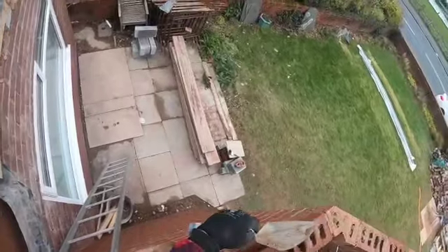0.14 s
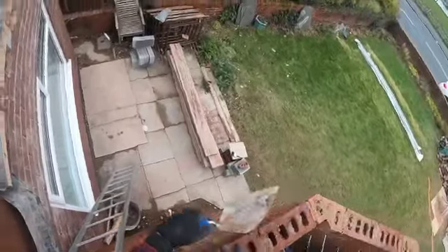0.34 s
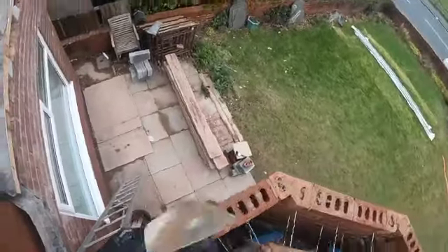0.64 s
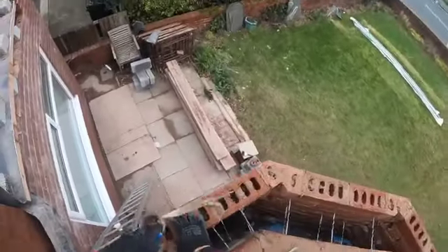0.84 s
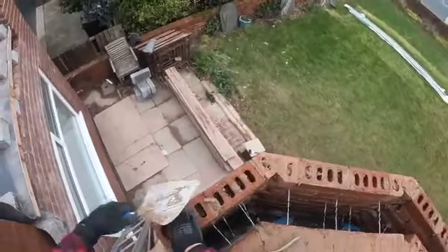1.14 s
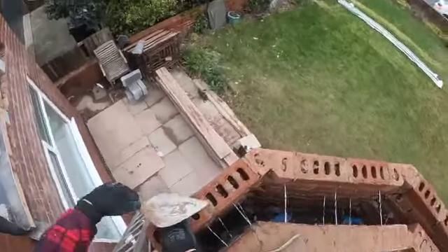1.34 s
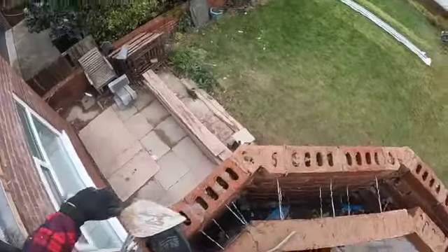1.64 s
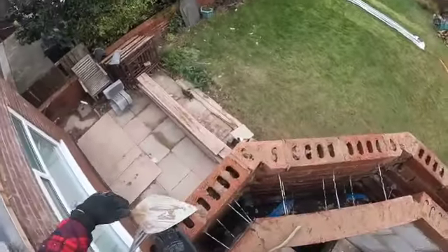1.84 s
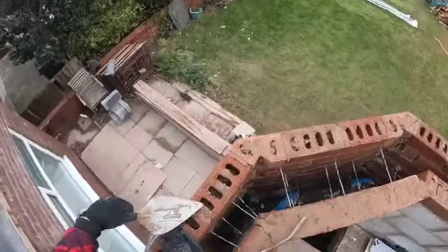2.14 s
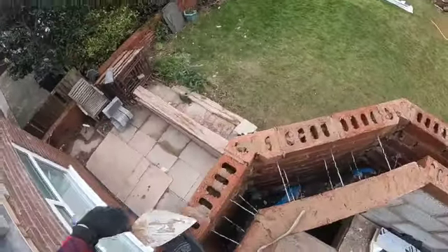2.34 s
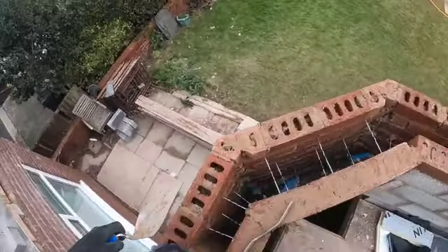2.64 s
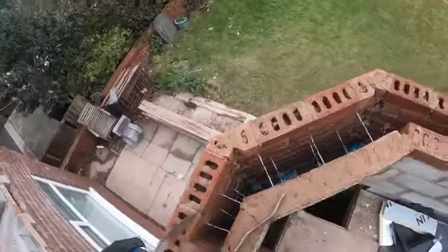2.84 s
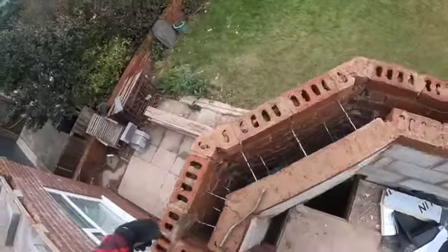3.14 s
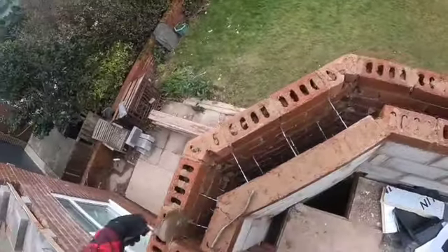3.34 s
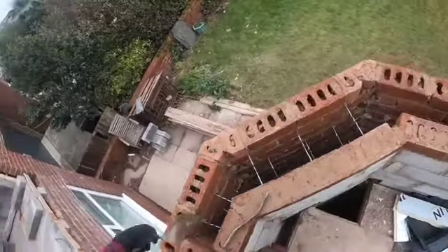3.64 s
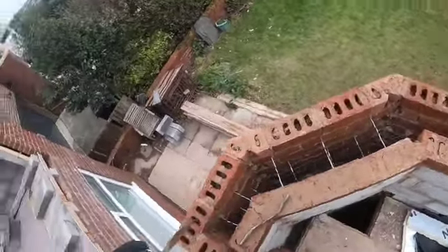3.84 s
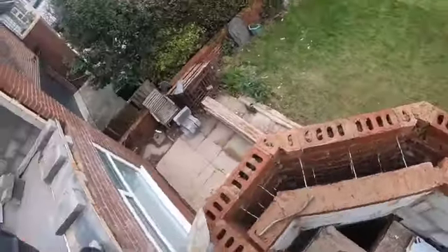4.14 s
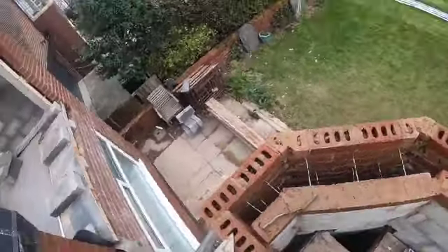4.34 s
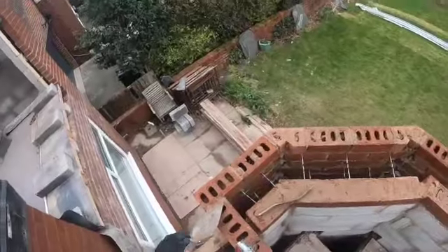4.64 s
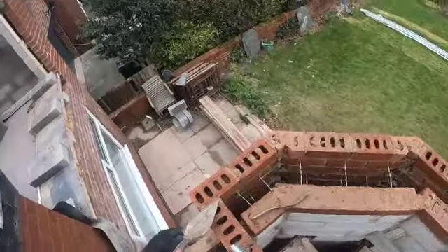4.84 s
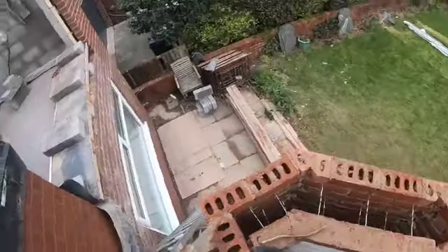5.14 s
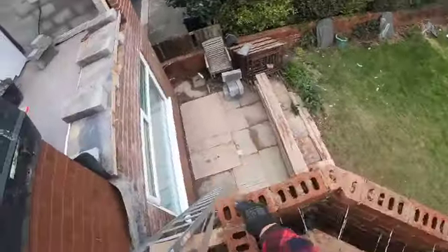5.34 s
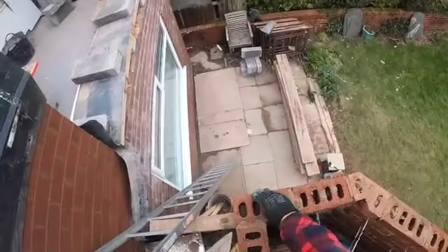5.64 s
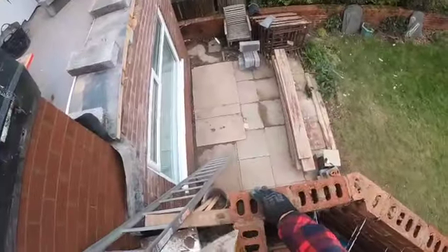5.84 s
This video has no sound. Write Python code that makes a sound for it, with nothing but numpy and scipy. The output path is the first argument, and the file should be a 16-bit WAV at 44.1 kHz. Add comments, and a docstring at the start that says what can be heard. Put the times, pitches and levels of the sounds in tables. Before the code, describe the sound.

An outdoor bricklayer's work heard in close stereo: gritty steel scrapes, rapid sandy crunches and brief clinks on hollow brick, separated by pauses. Nearby brickwork adds a very short noisy reflection. Traffic passes softly in the distance, wind gusts press low on the microphones, and a faint hum stays underneath. The strongest clank arrives in the second half; a soft gritty brick slide finishes.

```python
"""Beside fresh brick walls near a road, a steel trowel taps bricks and scrapes gritty mortar off them.
Sand cracks under the blade as random clicks that ring blade and brick; firm blows add fading notes.
The walls answer at once with a short tail of noise. Behind the work, shaped noise gives tyre roar, engines,
thin hiss and light wind on the microphones; wavering sines give a faint hum and, with noise, soft low booms."""
import sys
import numpy as np
from scipy import signal
from scipy.fft import rfft, irfft, next_fast_len
from scipy.io import wavfile
from scipy.ndimage import uniform_filter1d, map_coordinates

SR = 44100
rng = np.random.default_rng(int(sys.argv[2]) if len(sys.argv) > 2 else 0)


def generate_wav(signal):
    """Clip the signal to [-1, 1] and save it as 16-bit WAV at the path in sys.argv[1]."""
    frames = np.transpose(np.atleast_2d(signal))
    scaled = np.clip(frames, -1, 1) * 32767
    pcm = np.round(scaled).astype(np.int16)
    wavfile.write(sys.argv[1], SR, pcm)


N = 264581
TIME = np.arange(N) / SR


def amp(db):
    """Decibels to gain."""
    return 10 ** (np.asarray(db) / 20)


def unit(x):
    """x scaled to an average strength (rms) of 1."""
    return x / np.sqrt(np.mean(x ** 2) + 1e-20)


def along(points, hz):
    """Read a (frequency, value) curve, with straight lines on a log frequency axis."""
    f, v = np.transpose(points)
    return np.interp(np.log(hz + 1), np.log(f + 1), v)


def over_time(points):
    """Read a (time, value) curve at every sample."""
    s, value = np.transpose(points)
    return np.interp(TIME, s, value)


def noise(*shape):
    """Plain white noise."""
    return rng.standard_normal(shape)


def wobble(rate, t=TIME):
    """A smooth random curve through `rate` random points a second."""
    return map_coordinates(noise(8192), [t * rate], mode="wrap")


def filtered(x, response):
    """Filter x by a complex response given as a function of frequency."""
    n = x.shape[-1]
    m = 2 * next_fast_len((n + min(n, SR) // 4) // 2)  # spare room for the ringing
    spectrum = rfft(x, m) * response(np.fft.rfftfreq(m, 1 / SR))
    return irfft(spectrum, m)[..., :n]


def causal(points):
    """The response with this spectrum that reacts as early as possible (minimum phase)."""
    def response(hz):
        cep = irfft(np.log(amp(along(points, hz))))
        half = len(cep) // 2
        return np.exp(rfft(np.r_[cep[0], 2 * cep[1:half]], len(cep)))
    return response


def resonances(modes):
    """The response of a body that rings at several (frequency, width, level) modes of alternating sign."""
    def response(f):
        total = 0
        for k, (c, w, db) in enumerate(modes):
            total = total + (-1) ** k * amp(db) * 1j * f * w / (c * c - f * f + 1j * f * w)
        return total
    return response


def narrow(force, hz, width_hz):
    """force through the same resonance twice, which makes the band steeper, at rms 1."""
    return unit(filtered(force, lambda f: resonances([(hz, width_hz, 0)])(f) ** 2))


def patchy(x, depth_db, size):
    """Vary the colour of x in random patches that drift; size = (bands, frames) of a patch."""
    z = signal.stft(x, nperseg=512)[2]
    field = uniform_filter1d(noise(*z.shape[-2:]), size[0], axis=0)
    field = uniform_filter1d(field, size[1], axis=1)
    return signal.istft(z * amp(depth_db * unit(field)), nperseg=512)[1][..., :x.shape[-1]]


def add(track, s, x):
    """Mix x into track from time s on."""
    part = track[..., max(round(s * SR), 0):][..., :x.shape[-1]]
    part += x[..., :part.shape[-1]]


# how alike wide noise is at the two microphone ports: (frequency [Hz], likeness [0-1])
LIKENESS = [(100, 0.96), (500, 0.97), (1000, 1), (2200, 0.71), (4000, 0.21), (9000, 0.2)]


def rush(response):
    """Steady stereo noise of rms 1: sound from all around is less alike at the two ports in the treble."""
    def mid_side(hz):
        turn = np.arccos(np.clip(along(LIKENESS, hz), 0, 1)) / 2
        return response(hz) * np.array([np.cos(turn), np.sin(turn)])
    mid, side = filtered(noise(2, N), mid_side)
    return unit(np.array([mid + side, mid - side]))


# hum notes: (frequency [Hz], level before its waver [dB])
HUM_NOTES = [(96.9, -75), (290.2, -73.5)]


def hum(drift, waver_db):
    """A far machine hums on steady notes, a little unsteady in pitch and level."""
    clock = TIME + np.cumsum(drift * wobble(8.4)) / SR
    total = np.zeros(N)
    for hz, db in HUM_NOTES:
        level = np.sqrt(2) * amp(db + waver_db * wobble(2.1))  # the root turns rms into peak
        total += level * np.sin(2 * np.pi * hz * clock)
    return total


# swells of thin hiss: (time of the middle [s], spread [s], centre frequency [Hz], peak level [dB])
AIR_SWELLS = [(1, 0.081, 6200, -84), (1.453, 0.25, 4950, -83), (2.695, 0.27, 4360, -74.5),
              (5.15, 0.56, 4200, -76.5)]


def air():
    """Thin hiss swells and fades in the distance: bands of noise, each at another height."""
    out, t = np.zeros((2, N)), TIME[:2 * SR]
    for s, spread, hz, db in AIR_SWELLS:
        swell = amp(db) * np.exp(-((t - 1) / spread) ** 2 / 2)
        add(out, s - 1, swell * narrow(noise(2, len(t)), hz, width_hz=1800))
    return out


# soft low booms: (start time [s], length before the fade [s], relative level [dB])
BOOM_TIMES = [(0.436, 0.2, -38.5), (0.725, 0.18, -44), (0.967, 0.19, -50), (3.584, 0.1, -52.5),
              (4.046, 0.348, -47)]


def booms(rough_db):
    """A soft hollow boom swells, holds and fades, wandering in pitch, with a murmur of noise around it."""
    pitch_hz, wander_hz, rise_s, fall_db_per_s = 95, 4.5, 0.02, 155
    phase = 2 * np.pi * np.cumsum(pitch_hz + wander_hz * wobble(25)) / SR
    tone = unit(np.sin(phase) * amp(rough_db * wobble(30)))
    murmur = narrow(noise(N), pitch_hz, width_hz=60)
    swells = np.zeros(N)
    for s, length, db in BOOM_TIMES:
        fade_db = fall_db_per_s * np.maximum(TIME - s - length, 0)
        swells += np.clip((TIME - s) / rise_s, 0, 1) * amp(db - fade_db)
    return swells * unit(tone + amp(-6.0) * murmur)


# colour of the wind: (frequency [Hz], relative level per Hz [dB])
WIND_COLOUR = [(5, -9.5), (12, 5.5), (22, 4), (31, -12.5), (42, -18), (54, -18.5), (70, -33), (100, -35),
               (160, -51.5), (1500, -120)]
# gusts and lulls: (time of the middle [s], half length [s], level change [dB])
WIND_GUSTS = [(.2, 0.22, -1.5), (1.02, 0.21, 17), (2.173, 0.34, 11.5), (3.182, 0.4, 4), (4.6, 0.29, 0.5),
              (5.45, 1, 4)]


def wind():
    """A breeze buffets the microphones as low noise, swelling in gusts, nearly alike at both ports."""
    breeze_db, apart_db = -42, -17.5  # level outside the gusts, share that differs between the ports
    gust_db = sum(db * np.exp(-((TIME - s) / half) ** 2) for s, half, db in WIND_GUSTS)
    shared, apart = unit(filtered(noise(2, N), causal(WIND_COLOUR)))
    level = amp(breeze_db + gust_db + 0.87 * wobble(9.0))
    return level * (shared + amp(apart_db) * np.array([apart, -apart]))


# strength of the tyre roar: (time [s], relative level [dB])
ROAR_LEVEL = [(0.0, -45.5), (0.27, -49.5), (0.42, -46), (1.03, -42.5), (1.72, -44), (3.36, -41.5),
              (3.74, -42), (4.06, -43.5), (4.71, -44.5), (6.0, -49)]
# strength of the thin hiss, which begins with the fading tail of an earlier sound, then is the tyres':
# (time [s], level [dB])
HISS_LEVEL = [(0, -51), (.4, -61.5), (1.0, -58.5), (1.55, -56.5), (1.87, -62.5), (2.25, -57.5),
              (2.65, -58.5), (3.0, -61), (3.7, -63), (4.2, -63), (4.7, -66.5), (5.2, -66.5), (5.9, -70.5)]
# colours of roar, hiss, engine drone and engine rumble: (frequency [Hz], relative level per Hz [dB])
ROAR_COLOUR = [(320, -57), (550, -21.5), (605, -18.5), (781, -21), (860, -8), (992, 1.5), (1240, -1.5),
               (1400, 3), (1590, -5.5), (1800, 0.5), (2260, -10.5), (2520, -15), (2670, -20.5), (3130, -22),
               (3700, -39.5), (4810, -61), (8140, -120)]
HISS_COLOUR = [(1500, -29.5), (2900, 8.5), (3600, 0.5), (4600, -6.5), (5600, -11.5), (7000, -18.5),
               (8200, -28), (9800, -36), (12000, -52.5), (15000, -52)]
DRONE_COLOUR = [(60, -20.5), (110, -13), (170, -11), (245, -9.5), (288, 1.5), (330, -0.5), (370, -3.5),
                (490, -3), (590, -33.5), (720, -34.5), (1600, -120)]
RUMBLE_COLOUR = [(100, -65), (350, -9), (500, 4.5), (620, -9), (780, 7), (950, -10.5), (1500, -44.5),
                 (5000, -120)]
# nearer vehicles going by, levels when closest:
# (time when closest [s], half length [s], rumble level [dB], drone level before waver [dB], note level [dB])
PASSES = [(1.044, 0.27, -51.5, -55, -62.5), (2.805, 0.88, -58.5, -58, -53.5)]


def road():
    """Distant traffic: tyre roar with a singing band, thin hiss, engine drone and rumble, nearer passes."""
    drone_db, drone_follows = -57, 0.43  # middle level, dB gained for each dB of roar
    roar_db = over_time(ROAR_LEVEL)
    drone = amp(drone_db + drone_follows * (roar_db - roar_db.mean()))
    rumble = amp(-69)
    note = np.zeros(N)
    for s, half, rumble_db, pass_drone_db, note_db in PASSES:
        nearness = 1 / np.hypot(1, (TIME - s) / half)
        note += amp(note_db) * nearness ** 2
        drone = np.hypot(drone, amp(pass_drone_db) * nearness)
        rumble = np.hypot(rumble, amp(rumble_db) * nearness)
    tread = resonances([(1443, 48, 0)])  # the band in which the tread sings
    roar = rush(causal(ROAR_COLOUR)) + amp(-11) * rush(lambda hz: tread(hz) ** 2)
    roar_and_hiss = amp(roar_db + 1.5) * roar + amp(over_time(HISS_LEVEL)) * rush(causal(HISS_COLOUR))
    engines = drone * amp(1.55 * wobble(7)) * rush(causal(DRONE_COLOUR))
    engines += rumble * rush(causal(RUMBLE_COLOUR))
    engines += note * narrow(noise(N), hz=301, width_hz=77)  # exhaust resonance
    return patchy(roar_and_hiss + engines, depth_db=1.3, size=(5, 36))


# how fast the echo dies: (frequency [Hz], time to fall by 60 dB [s])
WALL_DECAY = [(300, 0.11), (2500, 0.15), (10000, 0.12)]


def walls(x):
    """The brickwork answers with a short, blurred tail of fading noise, different at each port."""
    hz, t, z = signal.stft(noise(2, SR // 3), SR, nperseg=256)
    fade = amp(-60 * t / along(WALL_DECAY, hz)[:, None])
    tail = signal.istft(z * fade, SR, nperseg=256)[1]
    return signal.fftconvolve(x, tail / np.linalg.norm(tail[0]), axes=1)[:, :N]


def nearby(x, echo_db, reach_s, count=6):
    """Hand, blade and brick edges reflect within milliseconds; being small, they return mostly treble."""
    delay = rng.uniform(0.000453, reach_s, (2, count, 1))  # anew for each pose and port
    gain = rng.choice([-1, 1], (2, count, 1))

    def response(hz):
        share = amp(echo_db) * hz ** 2 / (hz ** 2 + 4000 ** 2)
        echoes = (gain * np.exp(-2j * np.pi * hz * delay)).sum(axis=1)
        return (1 + share * echoes) / np.sqrt(1 + count * share ** 2)
    return filtered(x, response)


def touched(modes):
    """Each contact point weights the modes a little differently."""
    return [(hz, width, db + rng.standard_normal()) for hz, width, db in modes]


def body(force, modes):
    """The mid-range ring of the parts in contact, at rms 1."""
    band = causal([(100, -67.0), (400, -35.5), (700, -6.5), (900, 2.0), (3700, -0.5), (5000, -22.5),
                   (15000, -41.0)])  # (frequency [Hz], level [dB])
    ring = resonances(touched(modes))
    return unit(filtered(force, lambda hz: ring(hz) * band(hz)))


# colour of sand under steel: (frequency [Hz], relative level per Hz [dB])
GRIT_COLOUR = [(100, -59), (500, -2), (900, -14), (2000, 4.5), (3600, 3.5), (4200, 6), (5400, 5.5),
               (6100, 2.5), (7300, 5.5), (8100, -8.5), (9000, -9.5), (9900, -8.5), (10700, -20),
               (12400, -15.5), (13500, -23), (15500, -32)]
# ringing modes of the thin steel plate, before its pitch shift:
# (frequency [Hz], width [Hz], relative level [dB])
PLATE_MODES = [(2950, 65, 10), (3800, 79, -0.5), (4200, 55, 7), (5020, 110, 7), (5680, 150, 5),
               (6290, 160, -1.5), (7000, 380, -3.5), (8700, 240, -2.5), (10150, 200, -17.5)]


def rasp(force, steel_db):
    """Cracking sand and the thin singing of the plate that it excites, at rms 1."""
    shift = 1 + 0.011 * rng.standard_normal()  # pitch varies with the way the plate is pressed
    ring = resonances(touched(PLATE_MODES))
    plate = filtered(force, lambda hz: ring(hz / shift) / (1 + (hz / 10000) ** 8))
    return unit(unit(filtered(force, causal(GRIT_COLOUR))) + amp(steel_db) * unit(plate))


def finest(hz):
    """The share of each frequency that belongs to the finest sand: mostly above 8500 Hz."""
    return 1 / (1 + (8500 / (hz + 1)) ** 8)


def sand(size, rate, spread_db, pebble_rate, pebble_db, slip_hz, slip_db):
    """Sand cracks under the blade, bunched as it sticks and slips; coarse grains burst in short ticks."""
    burst_s = 0.00097  # a coarse grain crumbles with this time constant
    loudness_db = spread_db * np.clip(noise(2, size), -2, 1.5)
    sizes = rng.choice([-1, 1], (2, size)) * amp(loudness_db)
    chance = np.array([[rate], [pebble_rate]]) / SR  # rates in grains a second
    fine, coarse = (rng.random((2, size)) < chance) * sizes
    bursts = signal.lfilter([1], [1, -np.exp(-1 / (burst_s * SR))], np.abs(coarse)) * noise(size)
    bunched = fine * amp(slip_db * wobble(slip_hz, TIME[:size]))
    return unit(unit(bunched) + amp(pebble_db) * unit(bursts))


# short crunches and knocks of the blade's edge; the first is the end of a scrape:
# (time [s], relative crunch level [dB], time to fall by 60 dB [s], knock frequency [Hz],
#  relative knock level [dB])
EDGE_CRUNCHES = [ (0.001, -27, .035, 3080, -35), (0.029, -29.5, 0.026, 1500, -44),
                 (0.055, -28, 0.036, 3000, -32), (0.107, -28, 0.06, 2700, -20),
                 (0.143, -29, 0.032, 1550, -22), (0.177, -24.5, 0.024, 2300, -21),
                 (0.213, -32, 0.05, 3340, -21.5), (0.244, -19, .035, 1715, -13.5),
                 (0.353, -36, 0.012, 3296, -39), (0.482, -44, 0.011, 3500, -44),
                 (1.314, -48, 0.035, 3000, -56), (1.636, -29, 0.032, 2200, -29.5),
                 (1.690, -28.5, 0.042, 2000, -39), (1.731, -26, 0.031, 2380, -29),
                 (1.744, -22.5, 0.016, 2200, -30), (1.765, -23, 0.035, 2100, -22.5),
                 (1.782, -25.5, 0.013, 2400, -29), (1.793, -34.5, .02, 2410, -22),
                 (2.002, -31, .035, 2780, -39), (2.027, -29, 0.019, 2000, -27),
                 (2.043, -41, 0.049, 2050, -22.5), (2.063, -39, 0.029, 2800, -27.5),
                 (2.096, -27.5, .035, 2960, -28), (2.122, -35, 0.059, 1980, -21.5),
                 (2.340, -28, 0.033, 2420, -26.5), (2.388, -33, 0.027, 2300, -29),
                 (2.424, -23, 0.016, 2200, -25), (2.473, -21, 0.021, 2400, -29),
                 (2.494, -22.5, 0.026, 2400, -23.5), (3.488, -20.5, 0.027, 2700, -25),
                 (3.505, -19.5, 0.017, 2000, -37), (3.556, -32.5, 0.059, 4000, -37),
                 (3.793, -39, 0.022, 3000, -54), (3.809, -43, 0.015, 3000, -48),
                 (3.825, -31, 0.031, 3000, -31), (3.836, -19, 0.021, 5100, -21),
                 (3.86, -29.5, 0.044, 1840, -25.5), (3.887, -26, 0.019, 1790, -29),
                 (3.903, -26.5, .025, 1750, -26), (4.349, -16.5, 0.022, 3370, -19.5),
                 (4.382, -24, 0.028, 1900, -33), (4.416, -29.5, 0.024, 1800, -12.5),
                 (4.43, -27, 0.024, 1710, -17.5), (4.452, -34.5, .06, 3270, -23.5),
                 (4.479, -32.5, 0.024, 2800, -24), (4.81, -42, 0.02, 4200, -48),
                 (4.821, -39, 0.021, 4200, -39), (4.878, -49, .025, 4100, -40),
                 (5.014, -32, 0.032, 4150, -45), (5.058, -34, 0.032, 4300, -42),
                 (5.099, -28.5, .02, 3380, -34.5), (5.123, -47, .02, 3300, -33.5),
                 (5.294, -49, 0.034, 3020, -58), ]


def edge_crunches(level_db):
    """Sand under the blade's edge crunches sharply, with a dull knock set by where the brick is touched."""
    out, t = np.zeros((2, N)), TIME[:SR // 8]
    bite = 1 - np.exp(-t / 0.0035)
    for s, crunch_db, t60, knock_hz, knock_db in EDGE_CRUNCHES:
        grains = noise(len(t)) * (rng.random(len(t)) < 5000 / SR)
        fine_db = 0.45 * np.clip(crunch_db + 19, -10, 10)  # a crunch firmer than -19 dB is brighter
        crunch = filtered(rasp(grains, steel_db=-7.5), lambda hz: amp(fine_db * finest(hz)))
        knock = narrow(noise(len(t)), knock_hz, width_hz=850)
        sound = amp(crunch_db) * crunch + amp(knock_db) * knock
        sound = sound * bite * amp(-60 * t / t60)
        add(out, s, amp(level_db) * nearby(sound, echo_db=-1.5, reach_s=0.0054))
    return out


# ringing modes of the blade pressed on brick: (frequency [Hz], width [Hz], relative level [dB])
BLADE_MODES = [(940, 78, -3.5), (1438, 45, 2), (1726, 54, 5), (2067, 70, 3), (2300, 185, -5.5),
               (2690, 130, -4), (2980, 82, -7), (3270, 320, -4.5), (3570, 160, -5.5), (4330, 360, -4)]
# firm blows and the blade springing free:
# (time [s], clank level [dB], note frequency [Hz], note level [dB], note time to fall by 60 dB undamped [s],
#  upper note frequency [Hz], upper note level [dB], time until damped [s])
FIRM_BLOWS = [ (0.252, -43, 2720, -36, 0.11, 3150, -31, 0.019),
              (0.272, -52, 2730, -38.5, 0.19, 3010, -40, 0.042),
              (1.708, -41, 1680, -26, 0.055, 2800, -42, 0.03),
              (2.006, -40, 1750, -22.5, 0.08, 2820, -36, 0.0057),
              (2.031, -45, 1715, -33, 0.11, 2720, -39, 0.03),
              (2.096, -39.5, 1640, -24.5, 0.061, 2850, -26, 0.028),
              (3.581, -54, 2700, -42.5, 0.17, 3180, -49, 0.05),
              (4.35, -24.5, 986, -22.5, 0.17, 3257, -26.5, 0.013),
              (4.385, -44, 985, -23, 0.15, 2760, -39, 0.013),
              (4.405, -44, 915, -22, 0.079, 1700, -38, 0.012),
              (4.416, -29, 1780, -31, 0.06, 2720, -32, 0.012),
              (4.43, -31.5, 1685, -27, 0.06, 1980, -21, 0.015),
              (4.452, -35, 1710, -30, 0.1, 3210, -26, 0.025), ]


def blows(chatter_t60, waver, rise_cycles, upper_life, damping_db_per_s):
    """The blade chatters; brick or steel rings two wavering notes, cut short as blade or mortar settles."""
    out, t = np.zeros(N), TIME[:SR // 4]
    for s, clank_db, note_hz, note_db, t60, upper_hz, upper_db, free_s in FIRM_BLOWS:
        chatter = body(noise(len(t)), BLADE_MODES) * (1 - np.exp(-t / 0.0018))
        sound = amp(clank_db - 60 * t / chatter_t60) * chatter
        notes = (note_hz, note_db, t60), (upper_hz, upper_db, upper_life * t60)
        for hz, db, life in notes:
            clock = np.cumsum(1 + waver * wobble(130, t)) / SR
            fade_db = 60 * t / life + damping_db_per_s * np.maximum(t - free_s, 0)
            rise = 1 - np.exp(-t * hz / rise_cycles)
            sound += amp(db - fade_db) * rise * np.sin(2 * np.pi * hz * clock)
        add(out, s, sound)
    return out


def pressure(t, length, peak_at, swell_db, ease_db):
    """Gain of one stroke: the blade lands, the hand bears down in an arch, eases off and lifts."""
    press_s, lift_db_per_s = 0.0082, 600
    u, peak_at = np.minimum(t / length, 1), np.clip(peak_at, 0.05, 0.95)
    before_db = swell_db * (1 - u / peak_at) ** 2
    after_db = ease_db * ((u - peak_at) / (1 - peak_at)) ** 2
    arch_db = np.where(u < peak_at, before_db, after_db)
    lift_db = lift_db_per_s * np.maximum(t - length, 0)
    return np.minimum(t / press_s, 1) * amp(-arch_db - lift_db)


def travelling(x):
    """As the contact travels along blade and brick, the resonances bend in pitch and trade strength."""
    glide, glide_rate = 0.02016, 24  # typical share of pitch bend, random points a second
    clock = np.cumsum(1 + glide * wobble(glide_rate, TIME[:len(x)]))
    return patchy(map_coordinates(x, [clock]), depth_db=1.4, size=(5, 6))


# ringing modes of brick on wet mortar, before the low-mode change:
# (frequency [Hz], width [Hz], relative level [dB])
BED_MODES = [(1720, 400, 5), (2710, 750, -3.5), (3150, 440, 2)]
# trowel strokes, and a brick slid on its mortar bed by hand:
# (time [s], length [s], relative peak level [dB], place of the peak [0-1], start below the peak [dB],
#  end below the peak [dB], relative brick ring [dB], extra on the lowest mode [dB],
#  relative finest sand [dB], blade's strongest band [Hz], coarse grains against the sand [dB])
TROWEL_STROKES = [ (0.03, 0.22, -36.5, 0.7, 24.5, 4, 9.5, -3, 4.5, 5870, -11),
                  (1.648, 0.037, -60, 0.6, 2, -2, 6, 0, -8, 7000, -8),
                  (1.695, 0.11, -50.5, 0.6, 1.5, 7, 12, 4.5, -2, 6960, -4),
                  (2.028, 0.14, -51, 0.65, 8, 8.5, 11, 8, -2, 4460, -5),
                  (2.339, 0.038, -46.5, 0.3, 0, 9, 8, 7, -8, 6450, -7.5),
                  (2.392, 0.11, -48.5, 0.9, 1.5, 3, 8, 7, -1, 6400, -4.5),
                  (3.241, 0.038, -64.5, .5, 2, 7.5, -2, 7, 4.5, 7540, -5),
                  (3.322, 0.05, -66, 0.3, -12, 7.5, 8, 1, 2.5, 5500, -5),
                  (3.436, 0.096, -54.5, 0.7, 9, 6, 2, 4, 2.5, 7300, -5),
                  (3.52, 0.077, -52, 0.6, 6, 8, -11, 6, 3.5, 7160, -10),
                  (3.785, 0.067, -65.5, .4, 6, 2, 6, -2, 6, 7300, -10),
                  (3.83, 0.11, -51, 0.51, 4, 25, 15, -12, 7, 5700, -17),
                  (4.36, 0.03, -53.5, 0.3, -3, 6, 4, 2, 5.5, 3580, -8),
                  (4.382, 0.12, -41.5, 0.33, 10.5, 8.5, 11.5, -1, 4.5, 3400, -6),
                  (4.805, 0.076, -56.5, 0.5, 0, 15, 9.5, 7.5, 4.5, 4200, -5),
                  (4.87, 0.12, -73, 0.2, 2, 3, 18, -3, -2, 4200, -8),
                  (4.95, 0.2, -55, 0.6, 24, 26, 12, 7.5, 6.5, 4100, -13), ]
BRICK_SLIDES = [(5.43, 0.11, -72, 0.28, 3.3, 6.7, 15.5, 0, 0, 4260, -9),
                (5.598, 0.16, -58.5, 0.091, 2.8, 12.3, 12, 0.0061, 0, 3380, -7.5)]


def scrapes(strokes, modes, grit_db, ring_db, dull_hz):
    """Each stroke rasps with grit and rings blade and brick; bearing down crushes finer, brighter sand."""
    out, t = np.zeros((2, N)), TIME[:SR // 3]
    for (s, length, level_db, peak_at, swell_db, ease_db, bearing_db, low_db, fine_db,
         sing_hz, coarse_db) in strokes:
        brick = np.array(modes, float)
        brick[0, 2] += low_db
        grains = sand(len(t), rate=12000, spread_db=4, pebble_rate=110, pebble_db=coarse_db,
                      slip_hz=160, slip_db=2)
        rubbing = grains + noise(len(t))  # the brick feels smooth rubbing as well as grains
        singing = narrow(noise(len(t)), sing_hz, width_hz=1100)
        grit = rasp(grains, steel_db=-17) + amp(-6) * singing
        ring = body(rubbing, brick)
        sound = travelling(amp(grit_db) * grit + amp(ring_db + bearing_db) * ring)
        gain = pressure(t, length, peak_at, swell_db, ease_db)
        fine = filtered(sound, finest)
        crushed = amp(fine_db) * gain ** 0.19 * fine  # the finest sand grows faster than the pressure
        sound = amp(level_db) * gain * (sound - fine + crushed)
        add(out, s, nearby(sound, echo_db=-4.5, reach_s=0.004))
    return filtered(out, lambda hz: 1 / np.sqrt(1 + (hz / dull_hz) ** 10))


# left port against right port: (frequency [Hz], level [dB])
PORT_BALANCE = [(400, 0.5), (700, -2), (1300, 4.5), (1900, 0), (2500, 8), (3000, 6), (3700, 6),
                (4300, -3.5), (6000, -4.5), (6900, 0.5), (8200, -4), (11000, -0.5)]
# how far the housing advances the left port: (frequency [Hz], phase [radians])
HOUSING_PHASE = [(1400, -0.23), (2000, -0.6), (2900, 1.2), (3600, 0), (4300, -1.34), (5300, -0.9),
                 (6500, -0.1), (7500, 1.9), (8300, 1.1), (9700, 3)]


def at_ports(x):
    """Trowel and road lie to the right, so they reach the left port later; the housing colours each port."""
    lag_s = 0.000085
    side = np.array([[1], [-1]]) / 2

    def response(hz):
        phase = along(HOUSING_PHASE, hz) - 2 * np.pi * hz * lag_s
        return amp(side * along(PORT_BALANCE, hz)) * np.exp(1j * side * phase)
    return filtered(x, response)


def scene():
    """Trowel work with its wall answer and the road reach both ports; hum, booms and wind join in."""
    work = scrapes(TROWEL_STROKES, BLADE_MODES, grit_db=1.5, ring_db=-1.0, dull_hz=13000)
    work += scrapes(BRICK_SLIDES, BED_MODES, grit_db=2.5, ring_db=1.5, dull_hz=6960)
    work += edge_crunches(level_db=-5.5)
    work += blows(chatter_t60=0.078, waver=0.007, rise_cycles=3.3, upper_life=0.4, damping_db_per_s=1497)
    outside = work + amp(-9.0) * walls(work) + road() + air()
    low = hum(drift=0.0096, waver_db=-4.0) + amp(-6.0) * booms(rough_db=6.0)
    return at_ports(outside) + low + wind()


def record(dry):
    """Fade the very ends and keep nothing above 15700 Hz."""
    return filtered(dry * signal.windows.tukey(N, 0.001), lambda hz: hz < 15700)


dry = scene()
out = record(dry)
generate_wav(out)
```